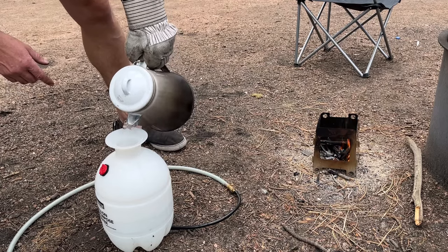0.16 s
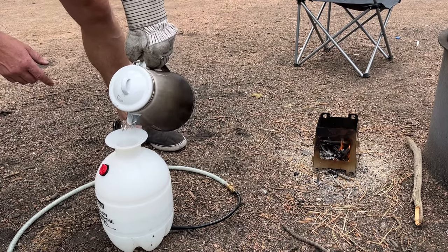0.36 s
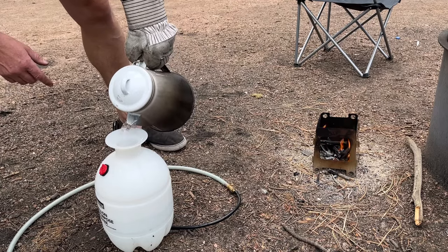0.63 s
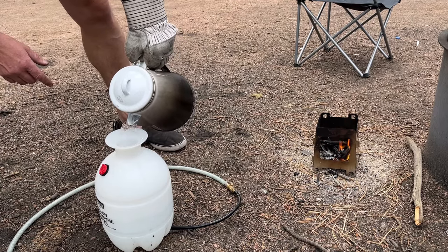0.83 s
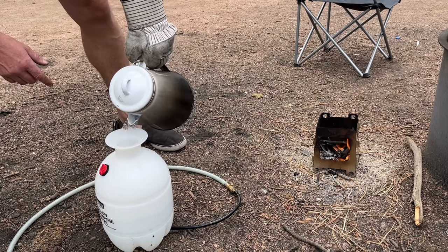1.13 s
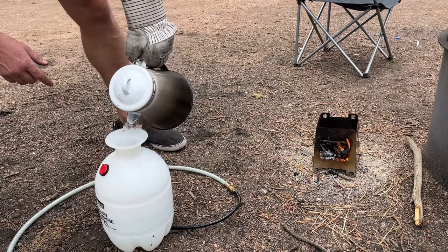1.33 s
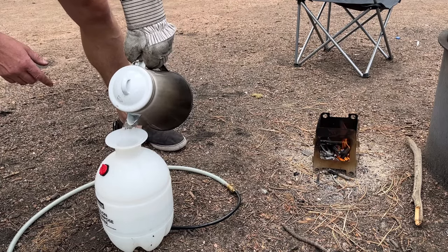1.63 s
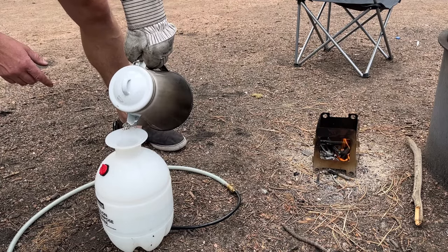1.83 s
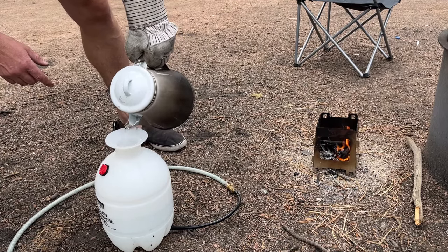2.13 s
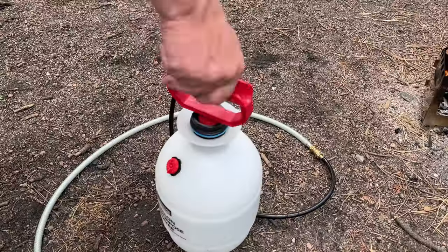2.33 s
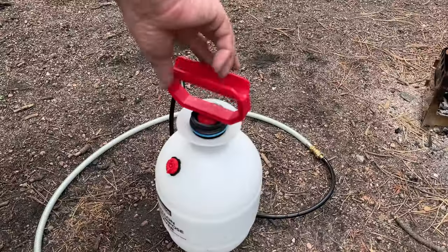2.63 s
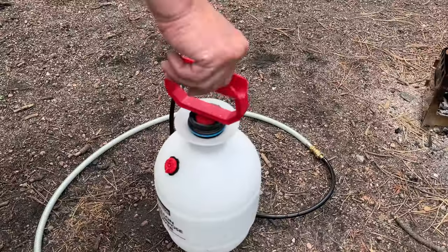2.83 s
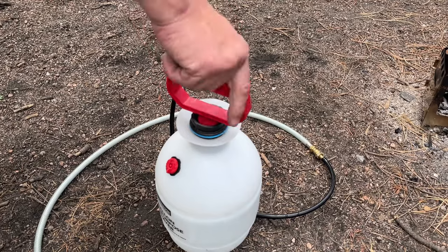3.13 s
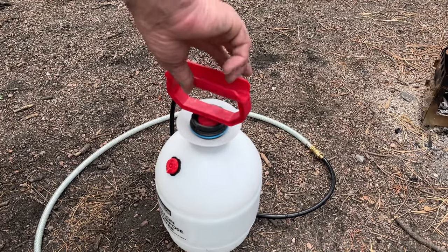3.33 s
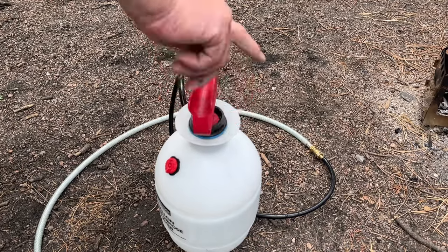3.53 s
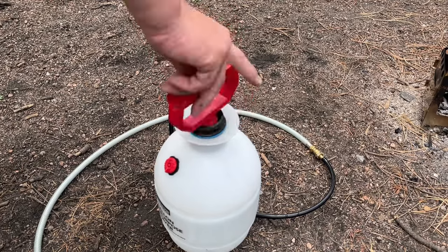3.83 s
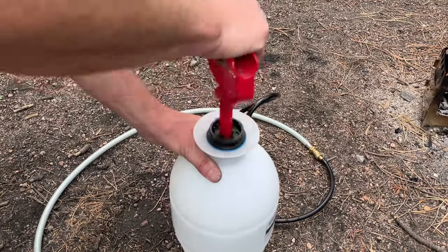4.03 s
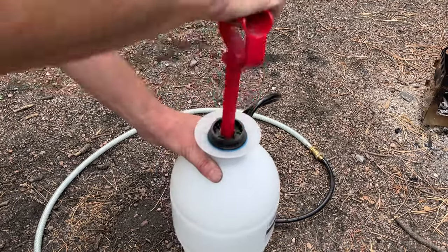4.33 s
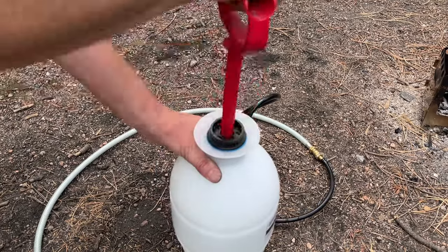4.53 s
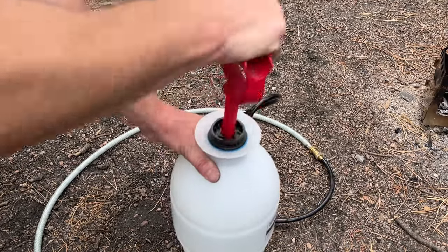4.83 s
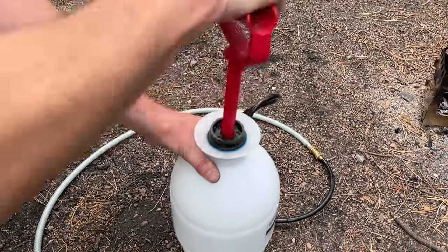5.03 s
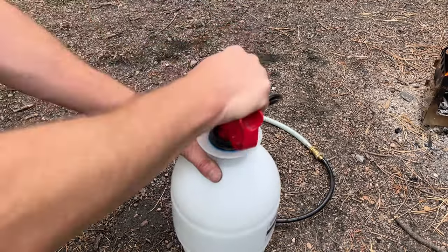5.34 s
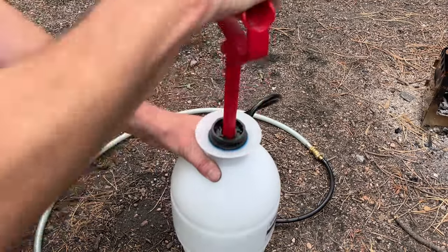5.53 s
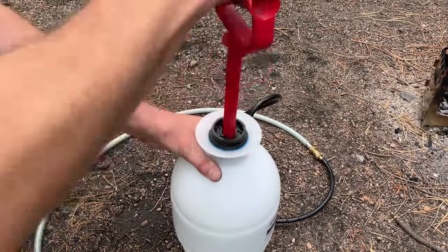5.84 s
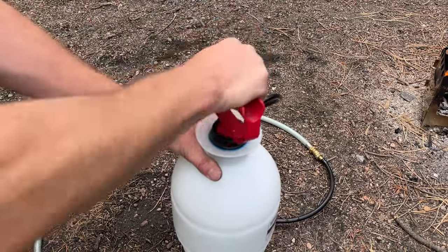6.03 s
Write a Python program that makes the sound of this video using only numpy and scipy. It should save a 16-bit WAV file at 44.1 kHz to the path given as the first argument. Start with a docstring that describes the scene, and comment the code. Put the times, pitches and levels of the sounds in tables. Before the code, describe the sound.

From the start, water pours steadily from a kettle into a plastic sprayer tank close by, gurgling, splashing and glugging with a hollow tone. A small fire gives one sharp, dry pop at about 1.5 seconds. The pouring stops at 2.2 seconds. Until about 3.9 seconds the pump is screwed in with short, quiet plastic scrapes, clicks and taps on the tank; the fire ticks softly twice and very faint birds whistle far away. From about 4 seconds to the end, just after 6, the handle is pumped quickly and much louder, around nine strokes at roughly four a second, slowing slightly. Each stroke has a short rubbery valve squeak, a brief hiss of air and hollow plastic knocks, the hardest near 4.2, 5, 5.3 and 5.8 seconds. A low outdoor rumble lies under everything and grows during the pumping.

```python
"""A hand pump on a plastic sprayer tank, outdoors over a low rumble. First water pours from a kettle
into the tank, gurgling through its resonances, while a small fire pops. Then the pump is screwed in by
short scraping turns as birds whistle far off. Last the handle is pumped fast: the rubber valve squeaks,
air hisses in the shrinking cylinder and the handle knocks on the tank."""
import sys
import numpy as np
from scipy import signal
from scipy.fft import rfft, irfft, next_fast_len
from scipy.io import wavfile
from scipy.ndimage import map_coordinates

SR = 44100
rng = np.random.default_rng(int(sys.argv[2]) if len(sys.argv) > 2 else 0)


def dump(signal):
    """Clip the signal to [-1, 1] and save it as 16-bit WAV at the path in sys.argv[1]."""
    limited = np.clip(np.atleast_2d(signal).T, -1, 1)
    pcm = np.round(limited * 32767).astype(np.int16)
    wavfile.write(sys.argv[1], SR, pcm)


N = 272097
T = np.arange(N) / SR

# resonances of rubbed plastic: (frequency [Hz], width [Hz], gain [dB])
RUB_MODES = [(350, 670, -5), (646, 6.5, 6), (837, 76, -1), (1946, 160, -4), (2296, 120, -4), (2940, 26, -5)]
# hollow ring of the closed tank: (frequency [Hz], width [Hz], gain [dB])
TANK_MODES = [(193, 34, -2.5), (333, 30, 1), (585, 38, -1), (752, 44, -5), (910, 47, -6.5),
              (1089, 64, -6.5)]
# down strokes: (start [s], end [s], level [dB], swell over the stroke [dB])
DOWN_STROKES = [(4.01, 4.078, -42.5, 1), (4.24, 4.311, -42.5, -3), (4.464, 4.545, -41.5, -6.5),
                (4.705, 4.785, -44, -3.5), (4.933, 4.999, -41, 1), (5.158, 5.235, -45.5, 3.5),
                (5.448, 5.53, -44.5, 1), (5.757, 5.83, -47.5, 13), (6.068, 6.153, -50.5, 13)]
# valve squeaks: (time [s], level [dB], pitch [Hz], upper pair offset [dB], decay time [s])
VALVE_SQUEAKS = [(3.92, -44.5, 883, -6.5, 0.12), (4.143, -24.5, 900, -18, 0.039),
                 (4.363, -27, 914, -20, 0.027), (4.601, -27.5, 906, -11, 0.043),
                 (4.837, -25, 894, -12.5, 0.056), (5.062, -27.5, 880, -8.5, 0.043),
                 (5.291, -26.5, 936, -10.5, 0.076), (5.605, -26, 887, -9, 0.13),
                 (5.917, -22.5, 865, -10.5, 0.076)]
# overall colour of the sound, with a deep dip near 8.3 kHz: (frequency [Hz], gain [dB])
COLOUR_RESPONSE = [(28, -18), (60, 1.5), (6800, 5), (7600, 2), (8300, -7), (9000, 3.5), (11000, 1.5),
                   (14300, -2), (15200, -20), (16300, -28.5)]


def amp(db):
    """dB to gain."""
    return 10 ** (np.asarray(db) / 20)


def unit(x):
    """Scale to rms 1."""
    return x / np.sqrt(np.mean(x ** 2) + 1e-20)


def along(points, hz):
    """Read (Hz, value) points on a log axis."""
    f, v = np.transpose(points)
    return np.interp(np.log(hz + 1), np.log(f + 1), v)


def curves(rows):
    """One value per sample for each column after the time."""
    s, *cols = np.transpose(rows)
    return [np.interp(T, s, c) for c in cols]


def span(start, end, edge_s):
    """1 from start to end, fading outside."""
    return np.clip(1 + np.minimum(T - start, end - T) / edge_s, 0, 1) ** 2


def progress(start, end):
    """0 at start, 1 at end."""
    return np.clip((T - start) / (end - start), 0, 1)


def attack(t, tau_s):
    """Exponential rise from 0 to 1."""
    return 1 - np.exp(-t / tau_s)


def sweep(t, hz, excess, tau_s):
    """Sine falling from (1 + excess) * hz to hz."""
    return np.sin(2 * np.pi * hz * (t + excess * tau_s * attack(t, tau_s)))


def wobble(rate_hz):
    """Smooth random curve, rate_hz knots a second."""
    return map_coordinates(rng.standard_normal(int(N * rate_hz / SR) + 4), [T * rate_hz])


def filtered(x, response):
    """Apply a complex frequency response."""
    m = next_fast_len(N + SR // 2)
    return irfft(rfft(x, m) * response(np.fft.rfftfreq(m, 1 / SR)), m)[..., :N]


def modes(peaks):
    """Causal response of (Hz, width, dB) resonances, alternating in sign."""
    return lambda f: sum((-1) ** k * amp(db) * 1j * f * w / (c * c - f * f + 1j * f * w)
                         for k, (c, w, db) in enumerate(peaks))


def noise(response, grain_db, rate_hz):
    """Coloured noise with a fluttering drive, rms 1."""
    return unit(filtered(rng.standard_normal(N) * amp(grain_db * wobble(rate_hz)), response))


def add(track, s, sound):
    """Mix a sound in at s seconds."""
    part = track[round(s * SR):][:len(sound)]
    part += sound[:len(part)]


def spread(make):
    """Two draws of a sound as mid and side of a wide pair."""
    # likeness of left and right: (frequency [Hz], correlation)
    correlation = [(60, 1), (300, 0.61), (1500, 0.24), (5000, 0.41), (15000, 1)]
    angle = lambda hz: np.arccos(np.clip(along(correlation, hz), -1, 1)) / 2
    weights = lambda hz: np.array([np.cos(angle(hz)), np.sin(angle(hz))])
    mid, side = filtered(np.array([make(), make()]), weights)
    return np.array([mid + side, mid - side])


def air():
    """Low outdoor rumble under a faint hiss."""
    # rumble over time: (time [s], level [dB])
    levels = [(0.0, -63.5), (0.93, -65.5), (1.61, -61.5), (2.95, -66), (3.33, -66), (3.64, -74),
              (3.92, -65), (4.12, -54), (5.72, -50.5), (5.82, -51), (6.17, -56)]
    # rumble spectrum: (frequency [Hz], gain [dB])
    spectrum = [(25, 1), (55, -6.5), (110, -7), (200, -18.5), (500, -21.5), (1500, -42), (3000, -39),
                (4500, -33.5), (7000, -67), (15000, -68.5)]
    rumble_db, = curves(levels)
    rumble = spread(lambda: noise(lambda f: amp(along(spectrum, f)), grain_db=3, rate_hz=6.9))
    hiss = spread(lambda: noise(lambda f: f / (f + 1500), grain_db=-8, rate_hz=3.09))
    return amp(rumble_db + 4) * rumble + amp(-83.5) * hiss


def birds():
    """Far, husky whistles, blurred by the trees."""
    # whistles: (start [s], length [s], first pitch [Hz], last pitch [Hz], level [dB])
    whistles = [(2.392, 0.096, 3100, 2140, -74.5), (2.508, 0.043, 2710, 2700, -79),
                (2.834, 0.04, 3090, 2680, -70), (2.906, 0.033, 3230, 2200, -72),
                (2.983, 0.052, 4280, 2970, -81), (3.171, 0.052, 4850, 3140, -80),
                (3.249, 0.04, 4210, 3230, -75.5), (3.302, 0.045, 4440, 5300, -84.5),
                (3.487, 0.023, 3300, 2670, -73), (3.517, 0.046, 4140, 5330, -80.5),
                (3.552, 0.066, 2540, 2930, -74), (3.616, 0.037, 4200, 4930, -85),
                (3.667, 0.023, 4650, 3930, -70), (3.707, 0.035, 4330, 3220, -83)]
    out = np.zeros(N)
    for s, length, first_hz, last_hz, db in whistles:
        glide_hz = first_hz + (last_hz - first_hz) * progress(s, s + length)
        husky_hz = glide_hz * (1 + .022 * wobble(350))
        tone = np.sqrt(2) * np.sin(2 * np.pi * np.cumsum(husky_hz) / SR)
        out += amp(db + 3.8 * wobble(120)) * tone * span(s, s + length, edge_s=0.01)
    t = T[:SR // 3]
    trees = rng.standard_normal((2, len(t))) * amp(-60 * t / 0.54)
    blur = signal.fftconvolve(out[None], trees / np.linalg.norm(trees[0]), axes=1)[:, :N]
    return 0.78 * out + 0.74 * blur


def ground(x, t60_s):
    """Short scattered return from the ground and nearby gear."""
    t = T[:SR // 6]
    tail = signal.lfilter([1, -.7], 1, rng.standard_normal((2, len(t)))) * amp(-60 * t / t60_s)
    return signal.fftconvolve(x[None], tail / np.linalg.norm(tail[0]), axes=1)[:, :N]


def fire():
    """Dry pops: a crack in the stick's own tone, a sharp top edge, a small echo off the ground."""
    # pops: (time [s], level [dB], edge offset [dB], body offset [dB])
    pops = [(1.464, -9.5, -2.5, -20), (2.4905, -41.5, 17.5, -32), (2.88, -39, -27, -21)]
    # burning sticks: (frequency [Hz], width [Hz], gain [dB])
    wood_modes = [(3400, 410, 5.5), (5070, 450, -7)]
    crack, direct, t = np.zeros(N), np.zeros(N), T[:SR // 20]
    echo_s = .003
    for s, db, edge_db, body_db in pops:
        spit = rng.standard_normal((2, len(t) + 2))
        echo = 0.058 * amp(db - 60 * (t - echo_s) / 0.0022) * (t > echo_s)
        fade = amp(db - 60 * t / 0.006) + echo
        edge = amp(edge_db - 4) * np.diff(spit[1], 2) * fade * (amp(-60 * t / 0.0038) + .15)
        body = amp(db + body_db - 60 * t / 0.0048) * np.sin(2 * np.pi * 900 * t)
        add(crack, s, 2.2 * spit[0, 2:] * fade)
        add(direct, s, edge + body)
    return filtered(crack, modes(wood_modes)) + direct


def bubbles(count, hz, spread_oct, cycles, size_db):
    """Random damped sines of rising pitch with a soft start, rms 1."""
    when, pitch, size = rng.random(count), rng.standard_normal(count), rng.standard_normal(count)
    bubble_hz = np.clip(hz * 2 ** (spread_oct * pitch), 250, 14000)[:, None]
    samples = np.arange(600)
    age = bubble_hz * samples / SR / cycles
    envelope = amp(size_db * np.clip(size, -2, 2))[:, None] * age * np.exp(-2 * age)
    wave = envelope * np.sin(2 * np.pi * cycles * age * (1 + 0.029 * age))
    at = (when * N).astype(int)[:, None] + samples
    return unit(np.bincount(at.ravel(), wave.ravel(), N + 600)[:N])


def pour():
    """The stream gurgles through the tank's resonances; bigger lumps of water splash and glug."""
    # stream: (time [s], tank air tone [dB], gurgle [dB], fizz [dB])
    levels = [(0.0, -57, -65, -64), (0.53, -63.5, -65, -60.5), (2.08, -58, -66, -63.5),
              (2.222, -59.5, -58, -58.5)]
    # hollow of tank and funnel: (frequency [Hz], width [Hz], gain [dB])
    hollow_modes = [(462, 58, -7.5), (977, 193, 0), (1418, 63, 0), (1690, 79, 3.5), (2295, 170, -7),
                    (2660, 200, 0), (3565, 66, 3), (3910, 14, 3.5), (4500, 410, -3), (5700, 280, -11), ]
    # air spring of the tank neck: (frequency [Hz], width [Hz])
    neck = (192, 12.2)
    # splashes: (time [s], level [dB], glug offset [dB], glug pitch [Hz])
    splashes = [(0.031, -39, -16, 850), (0.0856, -46.5, 1, 477), (0.1605, -41.5, -3, 792),
                (0.3437, -51, 10.5, 454), (0.4199, -38, -13, 360), (0.467, -36, -11, 883),
                (0.5553, -32.5, -12, 870), (0.599, -33.5, -18, 470), (0.727, -53.5, 5, 1305),
                (0.8071, -51.5, 13, 438), (0.982, -38, -28, 870), (1.1736, -41.5, -6.5, 894),
                (1.249, -39, -32, 495), (1.502, -56.5, 10.5, 1050), (1.567, -41, -3.5, 472),
                (1.625, -31.5, -13.5, 487), (1.742, -38, -11, 950), (2.05, -44, -7, 1000),
                (2.1972, -42, -4, 902)]
    # crisp drops: (time [s], level [dB])
    drops = [(0.0208, -41), (0.179, -42), (0.3969, -51), (0.4298, -41), (0.5704, -42), (0.6418, -53),
             (0.7062, -46), (0.781, -55), (0.8409, -51), (0.9257, -56), (1.0489, -47), (1.1237, -48),
             (1.1577, -51), (1.2839, -49), (1.6725, -36), (1.7857, -47), (1.9743, -47), (2.0272, -44),
             (2.0774, -47), (2.1324, -53), (2.17, -54)]
    tone_db, gurgle_db, fizz_db = curves(levels)
    hollow = lambda f: modes(hollow_modes)(f) + amp(-15)
    tone = amp(tone_db) * noise(modes([(*neck, 0)]), grain_db=1.5, rate_hz=24)
    churn = lambda: noise(lambda f: f / (f + 400) / (1 + (f / 3500) ** 2), grain_db=6, rate_hz=120)
    in_tank = lambda x, churn_gain: unit(filtered(x + churn_gain * churn(), hollow))
    low = lambda: in_tank(bubbles(1500, hz=1104, spread_oct=0.896, cycles=6.5, size_db=5), 0.5)
    high = lambda: in_tank(bubbles(7000, hz=3350, spread_oct=0.71, cycles=4.1, size_db=6), 1.55)
    mist = lambda: noise(lambda f: (f / (f + 5000)) ** 2, grain_db=2.2, rate_hz=30)
    lumps = wobble(45) + .4 * wobble(14)
    fizz = amp(fizz_db - 7.5 + 2.8 * lumps) * (spread(high) + amp(0.5) * spread(mist))
    gurgle = amp(gurgle_db + 2.5 + 3.1 * lumps) * spread(low)

    spray, slap, glugs, t = np.zeros(N), np.zeros(N), np.zeros(N), T[:SR // 10]
    for s, db, glug_db, hz in splashes:
        add(spray, s, amp(db - 60 * t / 0.033) * attack(t, 0.0044))
        add(slap, s, amp(db + glug_db - 60 * t / 0.053) * attack(t, 0.0014))
        glug = np.sin(2 * np.pi * hz * t) * attack(t, 0.00049)
        add(glugs, s, amp(db + glug_db - 60 * t / 0.074) * glug)
    for s, db in drops:
        add(spray, s, amp(db - 1.5 - 60 * t / 0.017) * attack(t, 0.0008))
    thump = amp(19) * filtered(slap, modes([(neck[0], 25, 0)]))  # each slap rings the tank air
    bright = lambda: noise(lambda f: hollow(f) * (f / (f + 3000)) ** 2, grain_db=3.5, rate_hz=360)
    dull = noise(lambda f: hollow(f) / (1 + (f / 1600) ** 4), grain_db=1, rate_hz=220)
    splashing = 0.75 * spray * spread(bright) + 0.52 * slap * dull + 0.65 * glugs + thump
    return (gurgle + fizz + tone + splashing) * span(0, levels[-1][0], edge_s=0.006)


def screw_thread():
    """Plastic thread scrapes and sticks; each slip taps the hollow tank."""
    # turns: (start [s], end [s], start level [dB], end level [dB], hiss offset [dB])
    turns = [(2.25, 2.35, -81.5, -54.5, -4.5), (2.544, 2.554, -65, -79, 13.5),
             (2.683, 2.833, -60.5, -59.5, -9), (2.906, 2.923, -66, -68, 4), (3.051, 3.126, -54.5, -46, -16),
             (3.39, 3.48, -47.5, -54.5, -19), (3.671, 3.725, -61, -73.5, -17), (3.735, 3.767, -61, -72, -1),
             (3.838, 3.899, -65, -44.5, -12)]
    envelopes = np.array([amp(db + (end_db - db) * progress(a, b)) * span(a, b, edge_s=0.019)
                          for a, b, db, end_db, _ in turns])
    turning = envelopes.sum(axis=0)
    hissing = amp(np.transpose(turns)[4]) @ envelopes
    colour = lambda f: modes(RUB_MODES)(f) + 0.078 * f / (f + 500) / (1 + (f / 3000) ** 4)
    scrape = noise(colour, grain_db=4, rate_hz=130)
    hiss = noise(lambda f: (f / (f + 3000)) ** 2, grain_db=5, rate_hz=110)
    slip_rate_hz = 110 * amp(4.5 * wobble(60))
    slip_count = np.floor(np.cumsum(slip_rate_hz / SR))
    slips = np.diff(slip_count, prepend=0) * amp(6.3 * rng.standard_normal(N))
    tank = modes(TANK_MODES)
    rattle = filtered(slips * turning, tank) / np.std(filtered(slips, tank))
    return 0.93 * turning * scrape + amp(-5.5) * rattle + hissing * hiss


def rod():
    """The rod rubs in its guide in short scrapes and around each squeak, over a faint rattle."""
    # scrapes: (start [s], length [s], level [dB])
    slides = [(3.961, 0.009, -32.5), (4.115, 0.007, -55), (4.178, 0.014, -51), (4.377, 0.037, -42),
              (4.428, 0.016, -51), (4.666, 0.025, -45.5), (5.152, 0.01, -53), (5.211, 0.0065, -46),
              (5.368, 0.013, -48.5), (5.419, .014, -48), (5.652, 0.016, -38.5), (5.945, 0.029, -56)]
    rub = noise(lambda f: modes(RUB_MODES)(f) + .3 / (1 + (f / 2500) ** 4), grain_db=2.6, rate_hz=150)
    hiss = noise(lambda f: (f / (f + 2500)) ** 2, grain_db=6, rate_hz=190)
    lift_s, drag_s = 0.018, 0.04
    scrapes = sum(amp(db) * span(s, s + length, edge_s=0.0048) for s, length, db in slides)
    scrapes += amp(-51) * sum(span(s, s + drag_s, edge_s=0.0098) for s, *_ in VALVE_SQUEAKS)
    lifts = amp(-51) * sum(span(s - lift_s, s, edge_s=0.036) for s, *_ in VALVE_SQUEAKS[1:])
    pumping = T > VALVE_SQUEAKS[0][0]
    rubbing = scrapes + amp(-58.5) * pumping
    hissing = amp(-9) * scrapes + lifts + amp(-67.5) * pumping
    return rubbing * rub + hissing * hiss


def piston():
    """Air leaks past the piston; the cylinder shortens, so its echoes swell and rise in pitch."""
    # cylinder hiss spectrum: (frequency [Hz], density [dB])
    spectrum = [(180, -37), (300, -10), (669, -13), (1540, -9), (2250, 1.5), (4620, -2.5), (6620, -1),
                (7420, -1.5), (8600, -24.5), (9330, -7), (12300, -7), (15000, -15.5)]
    push, travel = np.zeros(N), np.zeros(N)
    for start, end, db, swell_db in DOWN_STROKES:
        u = progress(start, end)
        arch_db = 5 * np.sin(np.pi * u)  # the hand is fastest in mid stroke
        push += amp(db + swell_db * u + arch_db) * span(start, end, edge_s=0.023)
        travel += np.clip((T - start) / (end - start), 0, 1.3) * (T < end + .03)
    column_hz = 430 * 2 ** (1.2 * travel + .04 * wobble(60))
    jet = rng.standard_normal(N) * amp(1.2 * wobble(90))
    dull = signal.lfilter([.55], [1, -.45], jet)  # the walls soak up the echoes' treble
    echoes = sum(.64 ** k * np.interp(T - k / column_hz, T, dull) for k in range(1, 7))
    column = jet + amp(3 * travel - 1) * echoes
    hiss = unit(filtered(column, lambda f: amp(along(spectrum, f) - along(COLOUR_RESPONSE, f))))
    phase = 2 * np.pi * np.cumsum(column_hz) / SR
    whoosh = amp(12 * travel - 30.5 + 5 * wobble(100)) * np.sin(phase + 1.15 * wobble(220))
    return amp(12) * push * (hiss + whoosh)


def valve():
    """The rubber valve flutters: a sagging tone, a raspy upper pair that spreads, then a tank jolt."""
    upper_hz, hold_s, sag_s = 2226, 0.0085, 0.006
    jolt_hz, jolt_delay_s = 87, 0.0156
    out, t = np.zeros(N), T[:SR // 8]
    after = np.clip(t - hold_s, 0, None)
    sagged_t = t + .25 * sag_s * attack(t, sag_s)
    hook_envelope = 3.5 * np.minimum(t / .012, 1) * amp(60 * after / .07)
    rasp_band = signal.butter(2, [700, 3200], "band", fs=SR, output="sos")
    for s, db, hz, upper_db, decay_s in VALVE_SQUEAKS:
        drift = np.cumsum(rng.standard_normal((3, len(t))), axis=1) * [[.025], [.08], [.08]]
        fade = 0.77 * amp(-90 * after / decay_s) + 0.31 * amp(-35 * after / decay_s)
        low = amp(db) * fade * np.sin(2 * np.pi * hz * sagged_t + drift[0])
        hook = hook_envelope * np.sin(2 * np.pi * .78 * upper_hz * t * (1 + 9 * t) + drift[1] / 2)
        pair = hook + 2.04 * np.sin(2 * np.pi * upper_hz * sagged_t + drift[2])
        upper = amp(db + upper_db - 1.5 - 60 * after / 0.023) * pair
        rasp = amp(db - 3 - 60 * after / 0.0043) * signal.sosfilt(rasp_band, rng.standard_normal(len(t)))
        jolt = amp(db - 13.5 - 60 * t / 0.17) * attack(t, .006) * np.sin(2 * np.pi * jolt_hz * t)
        add(out, s, attack(t, 0.00025) * (low + upper + rasp))
        add(out, s + jolt_delay_s, jolt)
    return out


def knocks():
    """Each blow snaps and rattles the shell; the filled tank adds body tone, ring and falling boom."""
    # blows: (time [s], level [dB], body offset [dB], boom offset [dB], body pitch [Hz])
    blows = [(2.357, -43.5, 4.5, -3, 315), (2.5406, -40, -19, -23, 320), (2.6802, -48, 6.5, -29, 314),
             (3.0776, -35.5, -21, -21, 317), (3.1148, -39, 7.5, -5, 338), (3.1778, -55, 0, -3, 433),
             (3.3697, -33.5, -4.5, -21, 327), (3.4148, -29, -10, -18, 377), (3.469, -51, 11.5, 2, 292),
             (3.509, -48, 3, -6, 307), (3.545, -56, 4.5, -2, 320), (3.667, -43.5, -16, -32, 374),
             (3.734, -42, 2.5, -34, 326), (3.8873, -38, 2.5, -15, 316), (3.9651, -11.5, -14.5, -26, 334),
             (3.9912, -20.5, -14, -22, 402), (4.0012, -18, -11, -27, 404), (4.125, -34, -5.5, -1.5, 527),
             (4.1859, -7.5, -13, -22, 422), (4.227, -22.5, -4, -14, 443), (4.4544, -23, -8, -9.5, 446),
             (4.6957, -31, 2, -5, 464), (4.9271, -30, 5.5, -0.5, 480), (4.9991, -4.5, -19, -23, 481),
             (5.1158, -30.5, -11.5, -31, 497), (5.239, -24.5, -17, -20.5, 537),
             (5.3297, -3.5, -12.5, -25, 512), (5.3379, -4, -11.5, -28, 350), (5.369, -30.5, -10, -0.5, 384),
             (5.4305, -29.5, -3.5, -18, 380), (5.6607, -14.5, -7, -18.5, 356), (5.69, -47, -4, 4, 520),
             (5.745, -23, -7.5, -10, 427), (5.8337, -5.5, -20, -22, 517), (5.9676, -9, -9, -21, 414),
             (5.976, -9, -17.5, -21.5, 555), (6.0568, -26, 2.5, -11, 395), (6.1654, -14, -38, -40, 523)]
    # modes of tank wall and handle: (frequency [Hz], level [dB], twice the t60 [s])
    shell_modes = [(783, 1, 0.027), (1177, -8, 0.082), (1395, -8, 0.045), (2000, -8.5, 0.022),
                   (2095, -1.5, 0.034), (2172, -3.5, 0.04), (3394, 1, 0.023), (4044, -3.5, 0.051),
                   (5330, -4, 0.023), (7060, -1, 0.03)]
    out, tank_drive, t = np.zeros(N), np.zeros(N), T[:SR // 5]
    for s, db, body_db, boom_db, hz in blows:
        bottoms_out = any(abs(s - end) < .012 for _, end, *_ in DOWN_STROKES)
        snap_db = -12 + 0.21 * db + 10 * bottoms_out  # harder blows snap more
        tilt_db_per_hz = min(snap_db + 11, 0) / 5000
        ring = np.zeros(len(t))
        for mode_hz, mode_db, twice_t60 in shell_modes:
            fade = amp(mode_db + rng.normal(0, 3.96) + tilt_db_per_hz * mode_hz - 120 * t / twice_t60)
            phase = 2 * np.pi * mode_hz * rng.normal(1, 0.07) * t
            ring += fade * np.sin(phase + 0.088 * np.cumsum(rng.standard_normal(len(t))))
        grit = rng.standard_normal(len(t) + 1)
        snap = amp(snap_db + 10 - 60 * t / 0.0085) * np.diff(grit)
        crack = ring * attack(t, 0.00078) + snap * attack(t, 0.0003)
        dull = signal.sosfilt(signal.butter(2, 2.8 * hz, fs=SR, output="sos"), grit[1:])
        thud = amp(-60 * t / 0.08) * dull * np.sqrt(SR / hz) / 5
        body_fade = amp(8 - 60 * t / 0.025) + amp(-13 - 60 * t / 0.12)
        tone = body_fade * sweep(t, hz, excess=0.32, tau_s=0.0022)
        body = (tone + 0.86 * thud) * attack(t, 0.0014) ** 2
        boom_hz = 64 * rng.normal(1, 0.092)
        boom = amp(2.45 - 60 * t / 0.2) * attack(t, 0.0053) * sweep(t, boom_hz, excess=4.18, tau_s=0.0077)
        add(tank_drive, s, amp(db + body_db + 20 - 60 * t / 0.0051) * grit[1:])
        add(out, s, amp(db - 9.5) * crack + amp(db + body_db) * body + amp(db + boom_db) * boom)
    return out + filtered(tank_drive, modes(TANK_MODES))


def scene():
    """Stereo mix; sprayer sounds differ between left and right in level and phase."""
    # left over right: (frequency [Hz], level [dB])
    lean = [(60, .5), (250, .8), (550, 2.4), (1500, .9), (4500, 2.2), (8500, -.5), (15000, 0)]
    # left ahead of right: (frequency [Hz], phase [rad])
    lead = [(60, 0), (1100, .2), (3360, 1), (4820, .8), (6630, -1), (8870, -3.4), (11100, -6),
            (15800, -9.6)]
    pump = screw_thread() + piston() + rod() + valve() + knocks()
    side = np.array([[.5], [-.5]])
    placement = lambda f: amp(side * along(lean, f)) * np.exp(1j * side * along(lead, f))
    sprayer = filtered(pump + pour(), placement)
    pops = fire()
    pops_pair = np.array([pops, amp(-1.5) * np.pad(pops, (6, 0))[:N]])  # right 6 samples late
    return sprayer + pops_pair + amp(-4) * ground(pump + pops, t60_s=0.02) + birds() + air()


def record(dry):
    """Overall colour with a deep dip near 8 kHz, soft overload, band limit."""
    ceiling, top_hz = .93, 16330
    x = filtered(dry, lambda hz: amp(along(COLOUR_RESPONSE, hz)))
    x = x / (1 + np.abs(x / ceiling) ** 6) ** (1 / 6)
    return filtered(x, lambda hz: hz < top_hz)


dry = scene()
out = record(dry)
dump(out)
```